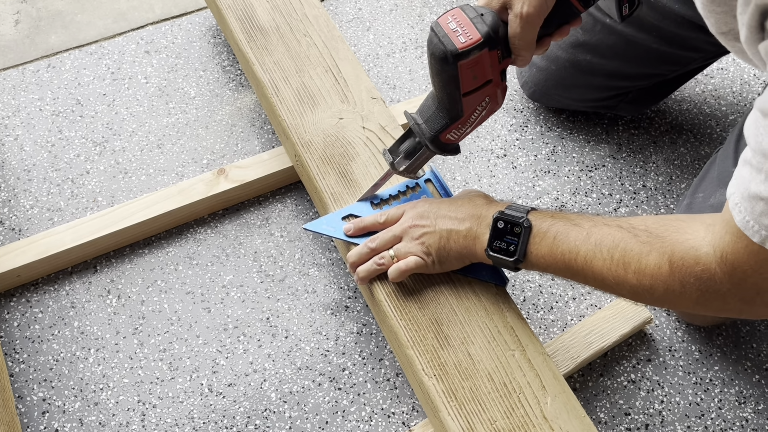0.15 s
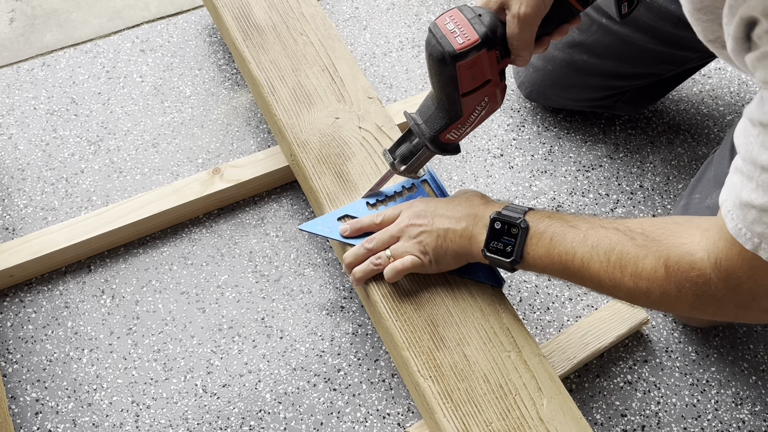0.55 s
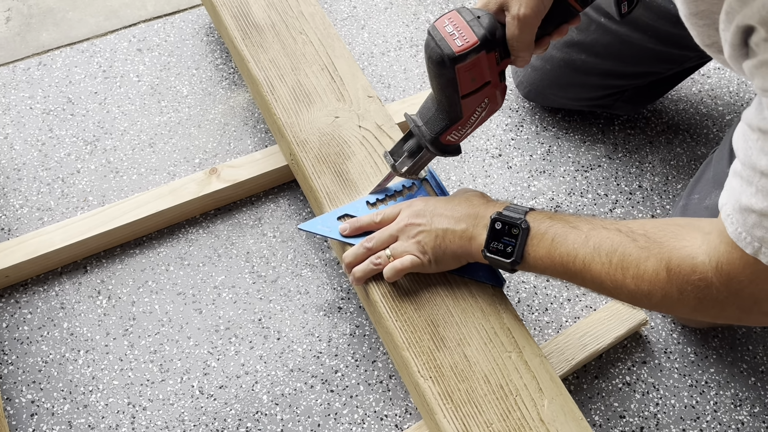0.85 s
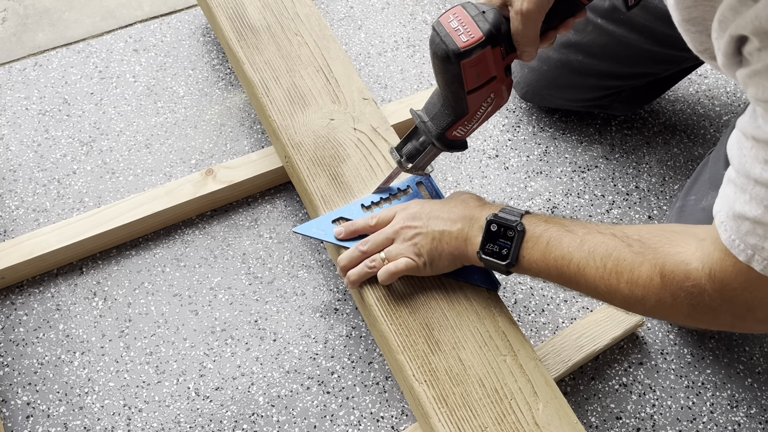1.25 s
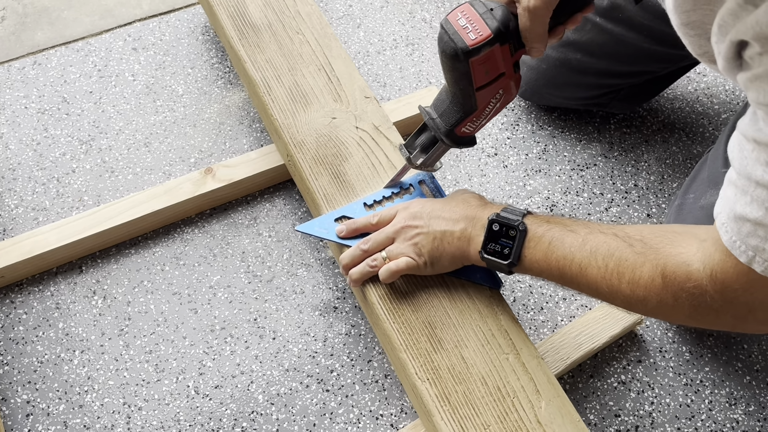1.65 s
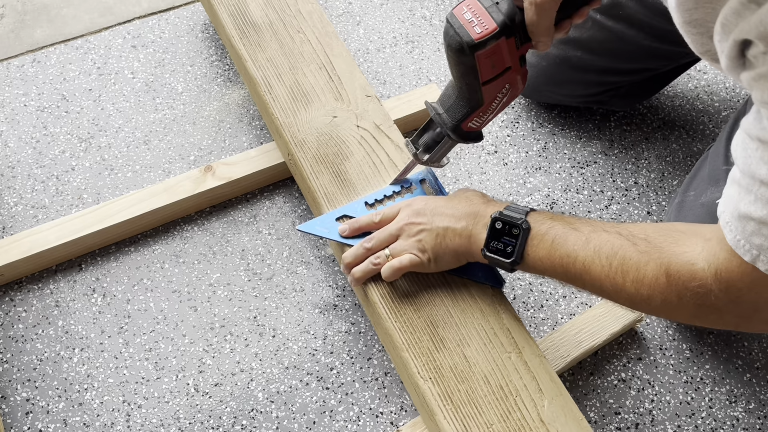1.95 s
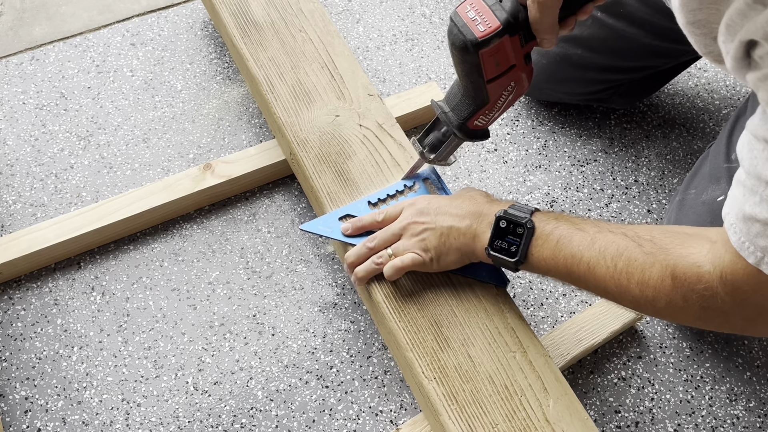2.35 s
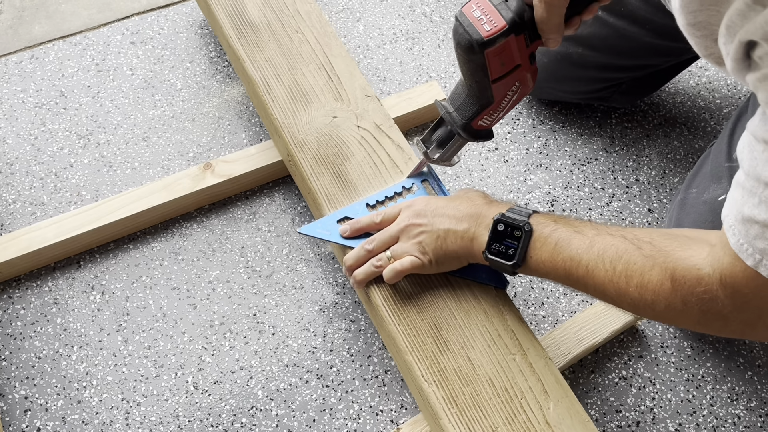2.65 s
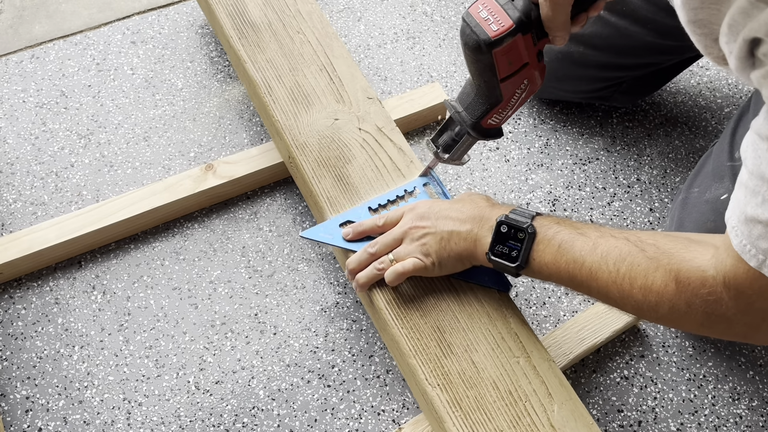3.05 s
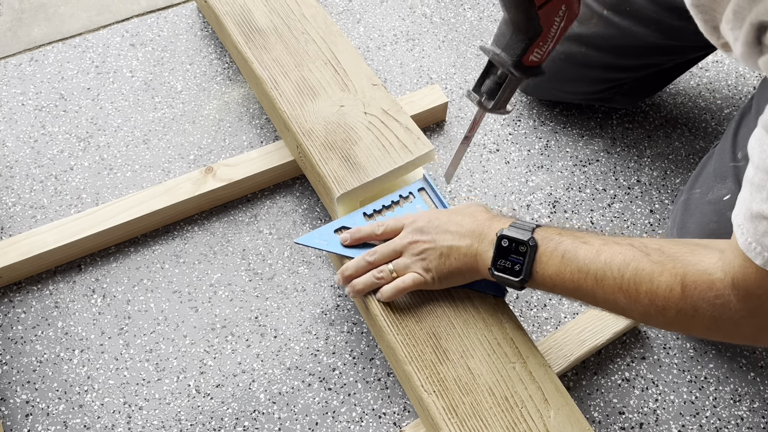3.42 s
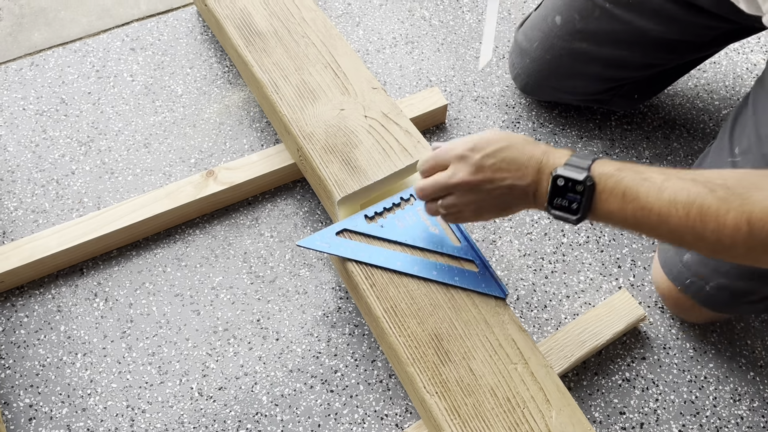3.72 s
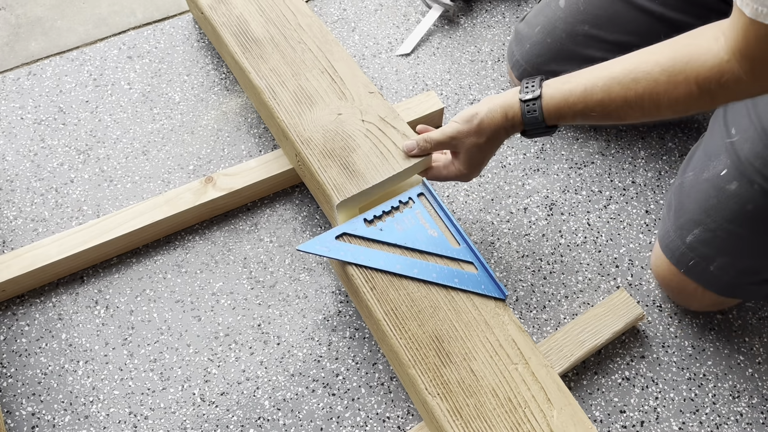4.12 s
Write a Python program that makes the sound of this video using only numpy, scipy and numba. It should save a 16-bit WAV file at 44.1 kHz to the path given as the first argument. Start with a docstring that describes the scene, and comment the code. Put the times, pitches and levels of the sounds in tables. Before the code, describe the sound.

Loud machine-gun-like sawing fills the start, with hollow beam resonance, gritty rasp, steel clatter and irregular harder bites. It gradually loses some weight, cracks through, whirrs unloaded for a moment and stops abruptly with a high chirp. In the lingering garage reverberation come small metallic clinks, a brief skin squeak, and dry knocks with a low thud. Close stereo pickup, quiet background.

```python
"""Garage floor, heard through two microphone ports: a cordless reciprocating saw cuts through a beam.
At about 36 strokes a second each stroke clacks (noise bursts, steel modes) and drags the teeth through the
beam (rough noise and jolts driving its boom and damped modes). The last fibres crack, the saw runs free and
falls silent with a brake chirp; as the room's echoes die away a metal square clinks and squeaks, and the
offcut knocks and thuds, all over a faint room tone."""
import sys
import numpy as np
from scipy import signal
from scipy.fft import rfft, irfft, next_fast_len
from scipy.io import wavfile
from numba import njit

SR = 44100
rng = np.random.default_rng(int(sys.argv[2]) if len(sys.argv) > 2 else 0)


def waveform_to_disk(signal):
    """Save audio, clipped to [-1, 1], as 16-bit WAV at the path in sys.argv[1]."""
    frames = np.transpose(np.atleast_2d(signal))
    scaled = np.clip(frames, -1, 1) * 32767
    samples = np.round(scaled).astype(np.int16)
    wavfile.write(sys.argv[1], SR, samples)


N = 188591
T = np.arange(N) / SR  # s
SIZE = next_fast_len(N + 2 * SR, real=True) // 2 * 2  # transform length with room for a tail
HZ = np.maximum(np.fft.rfftfreq(SIZE, 1 / SR), 1)

# the blade comes out of the beam; the trigger is let go; time for the load to fall away once through
THROUGH_S, STOP_S, UNLOAD_S = 3.13, 3.387, 0.087
# how fast the cutting sound dies once through, and the drive once braked
RELEASE_DB_PER_S, BRAKE_DB_PER_S = 119, 383

# the hand on the saw: [start_s, feed_pressure_db, extra_beam_ringing_db]
FEED = [(0.03, -2, 0.5), (0.2, -2, -3), (0.35, -1.5, 1.5), (0.47, 1.5, 0.5), (0.6, 3.5, -6), (0.85, 1, 2.5),
        (1.12, -1, 1), (1.28, -1.5, 2), (1.42, -2, 2), (1.82, -4.5, 7.5), (2.0, 1, -4.5), (2.15, -5, 3.5),
        (2.28, 1, -3.5), (2.42, -7.5, 4), (2.53, 4, -2), (2.62, 1, -6), (2.75, 0.5, -11), (2.92, 2.5, -6),
        (3.03, 2.5, -10)]
# ringing of blade and shoe: [pitch_hz, relative_level_db, t60_s]
STEEL_MODES = [(1615, -1, .04), (1925, -5, 0.035), (2366, -6, 0.02), (2527, 4.5, 0.055), (2675, 1, 0.04),
               (2885, -2, 0.014), (3880, -9, .04), (5030, -3, 0.02), (6870, -8, 0.035), (7220, -6, 0.025),
               (9400, -3, 0.025), (12070, -5.5, 0.01)]


def cutting(turns):
    """Teeth grab and drag on the pull stroke: the beam booms and rings, the kerf rasps and hisses."""
    # the saw tilts as it sinks, so the teeth grip earlier in the stroke: [start_s, cycle_share]
    grip_share = [(0, .35), (.7, .34), (1.2, .35), (1.9, .31), (2.5, .3), (3.0, .29)]
    unsteadiness = .02 * walk(6)  # share of the cycle
    grip = turns - curves(grip_share)[0] - unsteadiness
    force = tooth_force(grip)
    jolts = catches(grip)
    drag = unit(grit(patchy_db=-0.5) * force)
    sound = beam(drag, jolts) + kerf(turns, force)
    return sound * undb(-RELEASE_DB_PER_S * after(THROUGH_S))


def tooth_force(grip):
    """A steady drag that swells once a stroke, plus grabs and harder bites that build up and tear free."""
    # single strokes on which the blade bites harder: [start_s, relative_level_db]
    bites = [(0.014, 12.5), (.066, 3), (0.146, 14), (0.421, 9), (0.45, 13), (0.479, -2), (.507, 4.5),
             (0.537, 7.5), (0.704, 17), (.73, 1.5), (0.787, 3.5), (0.817, 3), (0.903, 7), (1.012, -1.5),
             (1.127, 3.5), (1.18, 6.5), (1.252, 13.5), (1.276, 8.5), (1.31, 3.5), (1.402, 7), (1.431, 7.5),
             (1.487, 12.5), (1.681, 2), (1.768, 7.5), (1.825, 5.5), (1.853, 8.5), (1.877, 5.5), (2.04, 4.5),
             (2.332, 8.5), (2.359, 10.5), (2.387, 15.5), (2.439, 10.5), (2.524, 11), (2.581, 6),
             (2.723, 3.5), (2.807, 11.5), (2.947, 4)]
    grabs = grab(each_stroke(grip, -0.12, db=7, scatter_s=.0015, scatter_db=1.8))
    hard_bites = grab(taps(*np.transpose(bites))) * undb(7.5)
    steady = undb(pull(grip, swing_db=2.9, peak=0.06, dip_db=2.2) + 11.5)
    return np.maximum(grabs, hard_bites) + steady


def catches(grip):
    """Sharp impulses where the teeth catch and jolt the beam, several in each stroke."""
    # the catches: [cycle_share_from_hardest_grip, relative_level_db, timing_scatter_s]
    catch_points = [(-.09, -4, 0.0006), (0, 0, 0.0004), (.13, -4, 0.0008), (.46, -9, 0.001)]
    return unit(sum(each_stroke(grip, share, db, scatter_s, scatter_db=4.0)
                    for share, db, scatter_s in catch_points))


def beam(drag, jolts):
    """Drag and jolts excite the beam's broad boom, its body and its damped modes."""
    # spectra of boom and body: [frequency_hz, relative_level_db_per_hz]
    boom_colour = [(60, -14), (115, -13), (160, -1.5), (250, 2), (320, 2.5), (430, 11), (520, -3.5),
                   (800, -34.5)]
    body_colour = [(250, -33.5), (430, -4.5), (530, 0), (620, -0.5), (720, 4.5), (790, 3), (860, 3),
                   (920, -9.5), (1100, 4), (1350, -15), (1800, -33.5)]
    # ringing of the sawn beam: [pitch_hz, relative_level_db, t60_s]
    beam_modes = [(978, 5, .04), (1014, 12.5, 0.04), (1050, 6, 0.05), (1108, 4, 0.06), (1150, 3, .06),
                  (1255, -4, 0.08)]
    # its lower notes: [pitch_hz, relative_level_db, t60_s]
    low_modes = [(432, 0, .08), (626, 0, .06), (848, 0, .045)]
    # they come and go as the blade moves through the wood: [start_s, first_db, second_db, third_db]
    low_notes = [(0, -44, -30.5, -31.5), (.22, -47.5, -24, -28.5), (.34, -31, -34.5, -33.5),
                 (.52, -43, -29.5, -24), (.72, -39, -36, -36), (.86, -20.5, -29, -47.5),
                 (1.0, -43, -30, -33.5), (1.24, -25.5, -44.5, -29), (1.4, -30.5, -30, -43),
                 (1.7, -34.5, -41.5, -31), (1.93, -38, -30.5, -32), (2.15, -38, -34, -33.5),
                 (2.32, -28.5, -31.5, -35), (2.46, -40, -43, -35.5), (2.75, -35, -27.5, -27),
                 (2.92, -34, -38.5, -34.5), (3.05, -29.5, -29, -34)]
    wander = .021  # drift of the beam's pitch under the hand (share)

    boom = unit(colour(jolts + undb(-9.0) * drag, boom_colour))
    boom = boom * undb(effort(start_db=-31.5, change_db=-1.5, per_feed_db=1))

    # the last strip thins to a hinge over 1 s and lets the offcut sound 2 dB louder
    hinge_db = 2 * nearing(1)
    body = unit(colour(drag + undb(-7.5) * jolts, body_colour))
    body = body * undb(effort(start_db=-25.5, change_db=-6.5, per_feed_db=0.87) + hinge_db)

    push = np.diff(drag + undb(-9.0) * jolts, prepend=0)
    notes = sum(unit(ring(push, [mode], wander)) * undb(db)
                for mode, db in zip(low_modes, curves(low_notes)))

    # the ringing is choked by 7 dB over the last 0.6 s of the cut
    choke_db = -7 * nearing(.6)
    ringing_db = effort(start_db=-21.5, change_db=-9.5, per_feed_db=0.75) + curves(FEED)[1] + choke_db
    ringing = unit(ring(push, beam_modes, wander)) * undb(ringing_db)
    return boom + body + notes + ringing


def kerf(turns, force):
    """Teeth rasp in the kerf, the blade rubs and slaps its sides and rings, the dust hisses."""
    # spectra of rasp and dust: [frequency_hz, relative_level_db_per_hz]
    rasp_colour = [(900, -16.5), (1300, 2), (1480, -3), (1620, 11), (1770, -30.5), (1930, -2), (2100, -3),
                   (2530, -1.5), (2750, -2.5), (3100, 0.5), (4000, -14), (4700, -13.5), (5700, -19.5),
                   (6900, -10), (9000, -31)]
    dust_colour = [(3000, -25), (5500, -5), (7000, 1), (8300, 0), (9600, 2), (11000, -1.5), (11800, .5),
                   (13000, -2.5), (14400, -5), (15500, -10)]
    # the blade rubs the side of the kerf: [start_s, gain_db]
    blade_rub = [(0, -6), (.6, -3), (.76, 3), (.92, 1.5), (1.08, 3), (1.2, 7.5), (1.33, 0), (3.0, -2)]
    # it also slaps the kerf as it whips: [cycle_share, relative_level_db]
    slap_points = [(.05, -3), (.4, 0), (.67, -2)]

    teeth = undb(pull(turns, swing_db=1.2, peak=0.32, dip_db=2.4))
    rasp = unit(colour(grit(patchy_db=1.5) * teeth * np.sqrt(force), rasp_colour))
    rasp = rasp * undb(effort(start_db=-26.5, change_db=-11.5, per_feed_db=0.79))

    rubbing = grit(patchy_db=4.5) * undb(pull(turns, swing_db=3.2, peak=0.31))
    scrape = np.diff(rubbing, prepend=0)
    slaps = sum(each_stroke(turns, share, db, scatter_s=.0003, scatter_db=2) for share, db in slap_points)
    # only the lower modes of the blade are reached
    rubbed, slapped = (unit(ring(x, STEEL_MODES[:6], wander=0.004)) for x in (scrape, slaps))
    blade_db = effort(start_db=-27, change_db=-17, per_feed_db=.8) + curves(blade_rub)[0]
    blade = unit(rubbed + slapped) * undb(blade_db)

    dust = unit(colour(grit(patchy_db=8.0) * teeth, dust_colour))
    dust = dust * undb(effort(start_db=-31, change_db=-13, per_feed_db=0.17))
    return rasp + blade + dust


def breaking_through():
    """The last fibres give way: rough bursts of coloured noise, each dying away fast."""
    # the cracks: [start_s, relative_level_db, decay_s, brightness_db_per_octave]
    cracks = [(3.03, -20, 0.014, -3.5), (3.038, -18, 0.011, -1), (3.066, -19, .008, -1.5),
              (3.095, -8.5, 0.0072, -2.5), (3.124, -14.5, 0.0076, -3.5), (3.1295, -8.5, 0.0019, 3),
              (3.175, -22.5, 0.016, -2.5), (3.198, -24, 0.013, -5), (3.233, -25.5, 0.018, -5.5),
              (3.36, -31, 0.0075, -5)]
    # their spectrum: [frequency_hz, relative_level_db_per_hz]
    crack_colour = [(80, -39), (130, -20), (185, -4), (280, -10), (400, -7), (750, -4.5), (1200, 0),
                    (1800, -10), (3000, -13.5), (7000, -19.5), (15000, -29)]
    return crunches(cracks, crack_colour)


def drive(turns):
    """The saw itself: clacking reversals, whirring gears and the shake of the moving blade."""
    return clacks(turns) + gear_whirr(turns) + free_whirr() + shaking(turns)


def clacks(turns, crack_s=0.0012, rattle_s=0.0052):
    """Each reversal and its rebound is a short noise burst that also rings the steel of blade and shoe."""
    # spectrum: [frequency_hz, relative_level_db_per_hz]
    clack_colour = [(500, -5.5), (1500, -8), (2600, 3), (3600, 4.5), (5100, -2.5), (6000, -4), (7000, -3),
                    (9500, -11.5), (12000, -13), (15000, -2)]
    reversals = each_stroke(turns, 0, 0, scatter_s=0.0002, scatter_db=1.5)
    rebounds = each_stroke(turns, 0.055, -7.5, scatter_s=0.0005, scatter_db=5)
    envelope = fade(reversals + rebounds, crack_s) + undb(-16.0) * fade(reversals, rattle_s)
    chatter = envelope * noise()
    steel = unit(ring(np.diff(chatter, prepend=0), STEEL_MODES, wander=0.0064))
    clack = unit(colour(chatter, clack_colour)) + undb(-3.0) * steel
    return clack * driven(start_db=-33, change_db=-4.5, per_feed_db=0.07, free_db=-43.5)


def gear_whirr(turns):
    """Gears loaded twice a turn make pulsing noise, and their teeth sing at high multiples of the stroke."""
    # spectrum: [frequency_hz, relative_level_db_per_hz]
    gear_colour = [(60, -36.5), (100, -20), (200, -0.5), (370, -1), (670, 1.5), (980, -5.5), (1300, -1.5),
                   (2000, -15), (2500, -10), (4500, -13.5), (7200, -30), (9500, -15.5), (11900, -17),
                   (15000, -28.5)]
    # singing teeth: [multiple_of_stroke_rate, level_against_gears_db]
    whine_tones = [(61, -17), (100, -22)]
    gears = unit(colour(grit(patchy_db=1.5) * undb(1.0 * np.cos(4 * np.pi * turns)), gear_colour))
    whine = shaft_tones(turns + 0.0056 * walk(60), whine_tones)
    return (gears + whine) * driven(start_db=-24, change_db=-7, per_feed_db=0.076, free_db=-38.5)


def free_whirr():
    """The unloaded motor whirrs: coloured noise that comes up as the load falls away."""
    # spectrum: [frequency_hz, relative_level_db_per_hz]
    whirr_colour = [(100, -19), (200, 8.5), (370, -8), (670, -3), (980, -16), (1300, -3.5), (1900, -2),
                    (2500, -4), (3200, -2.5), (4000, -11.5), (5000, -13.5), (7500, -16), (9500, -19),
                    (11900, -7.5), (15000, -21)]
    level_db = -35 - BRAKE_DB_PER_S * after(STOP_S)
    return unit(colour(noise(), whirr_colour)) * (1 - load()) * undb(level_db)


def shaking(turns, waver_db=2.2):
    """The stroke shakes the beam and the shoe buzzes on it, in tones locked to the stroke rate."""
    # shake, then shoe buzz: [multiple_of_stroke_rate, relative_level_db]
    shake_tones = [(1, -67), (2, -46), (3, -51), (4, -49), (5, -43.5)]
    buzz_tones = [(6, -41.5), (7, -41), (8, -42.5), (9, -41.5), (10, -44), (12, -43)]
    # the shoe sits hard on the beam for a while and buzzes louder: [start_s, gain_db]
    seating = [(1.45, 0), (1.65, 5.5), (2.08, 5), (2.22, 0)]
    shake = shaft_tones(turns, shake_tones, waver_db)
    buzz = shaft_tones(turns, buzz_tones, waver_db) * undb(curves(seating)[0])
    return (shake + buzz) * driven(start_db=1.3, change_db=-6.8, per_feed_db=0.5, free_db=-11)


def stopping(peak_s=3.398, rise_s=0.016, fall_s=0.0028):
    """The brake chirps, a swell of narrow noise, and the jolt leaves the free blade ringing."""
    # spectrum of the chirp: [frequency_hz, relative_level_db_per_hz]
    brake_colour = [(2000, -43), (3200, -7), (3650, -4), (3900, 1), (4100, -2), (4400, -6), (6000, -30)]
    # the jolt of the stop: [start_s, relative_level_db]
    stop_jolt = [(3.391, -55)]
    # the free blade: [pitch_hz, relative_level_db, t60_s]
    blade_modes = [(3865, 0, 1.1), (3965, -2, .8)]
    late = T - peak_s
    swell = np.exp(np.minimum(late / rise_s, -late / fall_s))
    chirp = unit(colour(noise(), brake_colour)) * undb(-33) * swell
    return chirp + ring(taps(*np.transpose(stop_jolt)), blade_modes, wander=0.006)


def handling():
    """The square rattles and squeaks, the offcut knocks and thuds."""
    return metal_square() + offcut()


def metal_square():
    """The square slips and rattles as it is let go: rough contacts ring its modes, and a finger squeaks off."""
    # the contacts: [start_s, relative_level_db, decay_s, brightness_db_per_octave]
    clinks = [(4.0185, -43, 0.004, 5), (4.0265, -43, 0.0067, 5), (4.033, -48.5, 0.009, 1.5),
              (4.05, -65, 0.052, 7.5)]
    # their spectrum: [frequency_hz, relative_level_db_per_hz]
    square_colour = [(300, -6), (1100, 6), (2500, 1), (4000, -5), (5400, -2), (7500, -17), (11000, -6),
                     (15000, -16)]
    # ringing of the metal: [pitch_hz, relative_level_db, t60_s]
    square_modes = [(1152, -2, 0.11), (2939, -9, .08), (5448, 0, 0.08), (6900, -1, .02), (10890, -7, 0.06),
                    (11330, -9, .06)]
    rattle = crunches(clinks, square_colour)
    ringing = undb(-35) * ring(rattle, square_modes, wander=0.0035)
    return rattle + ringing + squeak(middle_s=4.053, half_s=.015, hz=1830, glide_hz_per_s=600, db=-59)


def squeak(middle_s, half_s, hz, glide_hz_per_s, db):
    """Skin sticks and slips on metal: a brief, slightly rough tone."""
    late = T - middle_s
    roughness = 0.0156 * hz * unit(fade(noise(), 0.0023))
    pitch = hz + glide_hz_per_s * late + roughness
    tone = np.sqrt(2) * np.sin(2 * np.pi * np.cumsum(pitch) / SR)
    return undb(db) * np.exp(-(late / half_s) ** 4) * tone


def offcut():
    """The offcut is gripped and knocks against the beam, ringing its modes; its weight thuds on the support."""
    # the knocks: [start_s, relative_level_db, decay_s, brightness_db_per_octave]
    knock_rows = [(4.098, -54, 0.006, -2), (4.123, -52, 0.0036, 0), (4.126, -40, 0.0034, 3.5),
                  (4.137, -55.5, 0.095, 1.5), (4.154, -43, .002, 14), (4.162, -51, 0.0078, 3),
                  (4.1965, -26, 0.0039, -1.5), (4.201, -29, 0.004, 1.5), (4.215, -20, 0.0022, -1),
                  (4.222, -47, 0.021, 11), (4.256, -44, 0.01, 6)]
    # their spectrum: [frequency_hz, relative_level_db_per_hz]
    knock_colour = [(120, -17), (200, -9), (370, -9.5), (600, -2), (750, 2), (930, -7), (1200, 0.5),
                    (1700, -2.5), (2200, -2.5), (2800, -3), (4800, -14.5), (6400, -14), (8500, -33),
                    (11000, -19.5), (15000, -34)]
    # ringing of the offcut: [pitch_hz, relative_level_db, t60_s]
    offcut_modes = [(603, -46, 0.06), (1270, -43, 0.037), (1500, -41, 0.061), (2410, -39, 0.034),
                    (2750, -48, 0.022), (6250, -43, .02)]
    # thuds on the support: [start_s, relative_level_db]
    thuds = [(4.133, -53), (4.217, -34.5)]
    # ringing of the support: [pitch_hz, relative_level_db, t60_s]
    thud_modes = [(104, -3, 0.29), (122, -4, 0.092), (213, -10, .06)]
    knocks = crunches(knock_rows, knock_colour)
    # the support takes up the weight gradually, so the thud swells over a cycle
    support = signal.butter(1, [75, 150], "bandpass", fs=SR, output="sos")
    thud = signal.sosfilt(support, ring(taps(*np.transpose(thuds)), thud_modes))
    return undb(6.0) * thud + undb(1.5) * (knocks + ring(knocks, offcut_modes))


def ports(x):
    """The saw reaches the two microphone ports with different level and phase."""
    # left over right: [frequency_hz, level_db]
    port_db = [(60, 1.5), (200, 2), (380, .5), (700, -4), (1000, -8.5), (1250, -8), (2400, -2), (4400, 1),
               (8000, .3), (15000, 0)]
    # lag of right behind left: [frequency_hz, phase_radians]
    port_phase = [(100, 0), (1640, -.4), (2930, .8), (4650, 1.2), (5510, -.7), (6400, -1), (7600, -2.4),
                  (8300, -3.2), (9600, -4.3), (11000, -5.9), (12400, -6.4), (13100, -6.9), (14400, -8.9)]
    lean = undb(over_hz(port_db)[0] / 2)
    phase = over_hz(port_phase)[0]
    left_right = np.array([lean, np.exp(-1j * phase) / lean])
    return irfft(rfft(x, SIZE) * left_right)[:, :N]


def scatter(x, size=120):
    """Near floor and beam throw the treble back within 3 ms, differently to each port and as the saw moves."""
    # spectrum of the scattering: [frequency_hz, relative_level_db_per_hz]
    scatter_colour = [(1000, -25), (2500, -4), (4200, 3), (8000, -3), (14000, 0)]
    treble = colour(x, scatter_colour)[None]
    echoes = rng.standard_normal((2, 2, size)) / np.sqrt(size)
    one, other = (signal.fftconvolve(treble, e, axes=1)[:, :N] for e in echoes)
    tilt = 2 * walk(2.015)  # radians, blends the two echo patterns
    return undb(-9) * (np.cos(tilt) * one + np.sin(tilt) * other)


def garage(x, first_echo_s=.005, early_db=-1.0, early_s=0.01):
    """Dense early echoes, then a diffuse tail, unrelated left and right, decaying by frequency."""
    # the room: [frequency_hz, t60_s, relative_level_db]
    room = [(75, 1.8, -15), (135, 1.2, -16), (210, 1.4, -7.5), (320, 1.1, -6.5), (710, 1.24, -5),
            (1770, 1.09, -5.5), (4000, 1.4, -10.5), (6840, .85, -9.5), (9600, 1.4, -28), (15000, .6, -19.5)]
    hz, t, cells = signal.stft(rng.standard_normal((2, 3 * SR // 2)), SR, nperseg=512)
    t60, db = (c[:, None] for c in over_hz(room, np.maximum(hz, 1)))
    rate = np.log(1000) / t60
    envelope = (np.exp(-rate * t) + undb(early_db) * np.exp(-t / early_s)) * (t > first_echo_s)
    tail = signal.istft(cells * undb(db) * np.sqrt(2 * rate / SR) * envelope, SR)[1]
    return signal.fftconvolve(x[None], tail, axes=1)[:, :N]


def room_tone():
    """Faint coloured noise, partly shared by the two ports and partly each port's own."""
    # spectrum: [frequency_hz, relative_level_db_per_hz]
    floor_colour = [(20, -25), (45, -1), (65, 6), (190, -15), (1000, -14), (2200, -22), (4000, -26),
                    (12000, -46)]
    own = np.array([colour(noise(), floor_colour) for _ in range(2)])
    return undb(-68) * (colour(noise(), floor_colour) + .4 * own)


def depth():
    """Share of the beam that is cut; the blade sinks at an even pace."""
    return np.minimum(T / THROUGH_S, 1)


def nearing(last_s):
    """Rises from 0 to 1 over the last seconds of the cut."""
    return np.clip(1 + (T - THROUGH_S) / last_s, 0, 1)


def load():
    """1 while the blade is in the beam, falling to 0 once it is through."""
    return np.clip(1 - (T - THROUGH_S) / UNLOAD_S, 0, 1)


def after(start_s):
    """Seconds since a moment, 0 before it."""
    return np.maximum(T - start_s, 0)


def effort(start_db, change_db, per_feed_db):
    """Level in dB: its start, its change by the end of the cut, and dB per dB of feed pressure."""
    return start_db + change_db * depth() + per_feed_db * curves(FEED)[0]


def driven(start_db, change_db, per_feed_db, free_db):
    """Gain of a sound of the drive: loaded, then running free, then braked."""
    loaded_db = load() * effort(start_db, change_db, per_feed_db)
    return undb(loaded_db + (1 - load()) * free_db - BRAKE_DB_PER_S * after(STOP_S))


def pull(turns, swing_db, peak, dip_db=0):
    """Tooth pressure in dB: swings once a cycle about its peak (cycle share), with a twice-a-cycle dip."""
    angle = 2 * np.pi * (turns - peak)
    return swing_db * np.cos(angle) + dip_db * np.cos(2 * angle)


def each_stroke(turns, share, db, scatter_s, scatter_db):
    """An impulse at the same point of every stroke, never quite alike."""
    count = np.arange(int(turns[-1]))
    chance = np.sqrt(3) * rng.uniform(-1, 1, (200, 2))[count]  # spread of 1
    times = np.interp(count + share, turns, T) + scatter_s * chance[:, 0]
    return taps(times, db + scatter_db * chance[:, 1])


def taps(times, db):
    """One impulse at each time."""
    out = np.zeros(N)
    inside = (times >= 0) & (times < T[-1])
    np.add.at(out, (times[inside] * SR).astype(int), undb(db)[inside])
    return out


def grab(x, rise_s=.0014, length_s=.006):
    """At each impulse the teeth dig in quickly, then tear free."""
    return fade(x, length_s) - fade(x, rise_s)


def fade(x, length_s):
    """Let each impulse die away exponentially."""
    return signal.lfilter([1], [1, -np.exp(-1 / (length_s * SR))], x)


def grit(patchy_db, size=40):
    """Noise whose strength jumps, within limits, from one torn grain (size in samples) to the next."""
    grains = undb(patchy_db * np.clip(rng.standard_normal(N // size + 1), -2, 2))
    return unit(noise() * np.repeat(grains, size)[:N])


def crunches(rows, points, size=8192):
    """Short rough contacts: coloured noise bursts, each dying away exponentially."""
    out = np.zeros(N + 2 * size)
    for start_s, db, decay_s, tilt_db in rows:
        burst = rng.standard_normal(size) * np.exp(-T[:size] / decay_s)
        sound = signal.fftconvolve(burst, response(points, tilt_db))
        first = int(start_s * SR)
        out[first:first + len(sound)] += undb(db) * sound
    return out[:N]


def shaft_tones(turns, orders, waver_db=0):
    """Tones locked to whole multiples of the stroke rate; the higher ones waver most."""
    out = np.zeros(N)
    for k, db in orders:
        level = undb(db + waver_db * min(k / 6, 1) * walk(4.01))
        phase = 2 * np.pi * (round(k) * turns + rng.random())
        out += level * np.sqrt(2) * np.sin(phase)
    return out


def ring(x, modes, wander=0):
    """Drive damped modes with x; each may drift in pitch at random by a share of its frequency."""
    out, blocks = np.zeros(N), T[::64]
    for hz, db, t60 in modes:
        angle = 2 * np.pi * hz * (1 + wander * walk(6.5, blocks)) / SR
        decay = np.exp(-np.log(1000) / (t60 * SR))
        add(out, undb(db) * x, decay * np.cos(angle), decay * np.sin(angle))
    return out


@njit
def add(out, x, cos, sin):
    """Add one damped mode driven by x: a shrinking rotation, its pitch renewed every 64 samples."""
    re, im = 0., 0.
    for i in range(len(x)):
        c, s = cos[i // 64], sin[i // 64]
        re, im = re * c - im * s + x[i] + 1e-18, re * s + im * c
        out[i] += im


def walk(rate, at=T):
    """Slow random drift with a spread near 1; rate in steps per second."""
    steps = rng.standard_normal(400)
    return np.interp(at * rate, np.arange(len(steps)), steps)


def noise():
    """White noise."""
    return rng.standard_normal(N)


def colour(x, points):
    """Give a sound a spectrum."""
    return signal.oaconvolve(x, response(points))[:N]


def response(points, tilt_db=0, size=4096):
    """Causal impulse response of unit power with the given spectrum, tilted per octave."""
    hz = np.maximum(np.fft.rfftfreq(size, 1 / SR), 1)
    gain = unit(undb(over_hz(points, hz)[0] + tilt_db * np.log2(hz)))
    # folding the cepstrum gives minimum phase
    cepstrum = irfft(np.log(gain))
    cepstrum[1:size // 2] *= 2
    cepstrum[size // 2 + 1:] = 0
    return irfft(np.exp(rfft(cepstrum)))


def curves(rows, at=T):
    """The columns of a table, joined by straight lines."""
    first, *columns = np.transpose(rows)
    return [np.interp(at, first, c) for c in columns]


def over_hz(rows, hz=HZ):
    """The columns of a table on a log-frequency axis."""
    return curves([(np.log(r[0]), *r[1:]) for r in rows], np.log(hz))


def unit(x):
    """Scale to rms 1."""
    return x / np.sqrt(np.mean(x ** 2))


def undb(db):
    """Decibels to gain."""
    return 10 ** (np.asarray(db) / 20)


def scene():
    """Saw and handling in the garage, over a faint room tone."""
    # crank speed under load: [start_s, strokes_per_s]
    loaded_speed = [(0.0, 37.38), (0.2, 37.32), (0.45, 36.2), (0.8, 35.49), (1.2, 36.03), (1.5, 35.7),
                    (1.9, 35.29), (2.3, 35.5), (2.6, 35.76), (2.85, 35.45), (3.15, 35.74)]
    # once through, the load falls away and the crank speeds up by 8.5 %
    speed = curves(loaded_speed)[0] * (1 + 0.085 * (1 - load()))
    # whole turns are reversals of the blade; the first comes 0.4806 of a turn in
    turns = np.cumsum(speed) / SR - .4806
    saw = cutting(turns) + drive(turns) + breaking_through() + stopping()
    hands = handling()
    hands_left_right = hands * undb(np.array([[-.8], [.8]]))
    direct = ports(saw) + scatter(saw) + hands_left_right
    return direct + garage(saw + undb(4.0) * hands) + room_tone()


def record(dry):
    """The recorder drops the deepest bass, rounds the highest peaks and cuts the top."""
    wet = signal.sosfilt(signal.butter(4, 30, "highpass", fs=SR, output="sos"), dry)
    wet = wet / (1 + (wet / .95) ** 6) ** (1 / 6)
    return signal.sosfilt(signal.ellip(8, .2, 70, 14900, fs=SR, output="sos"), wet)


dry = scene()
out = record(dry)
waveform_to_disk(out)
```